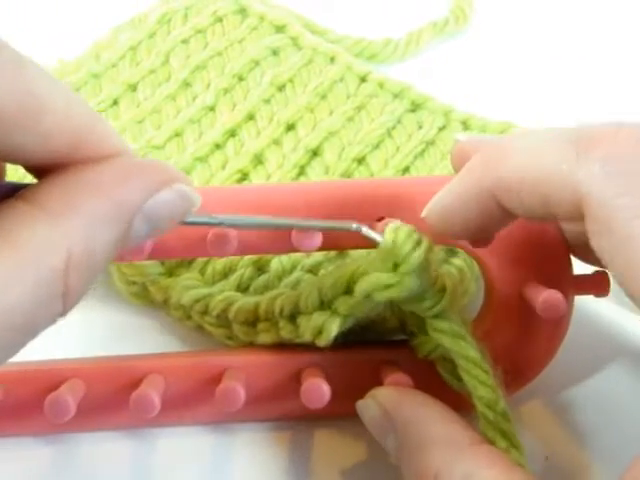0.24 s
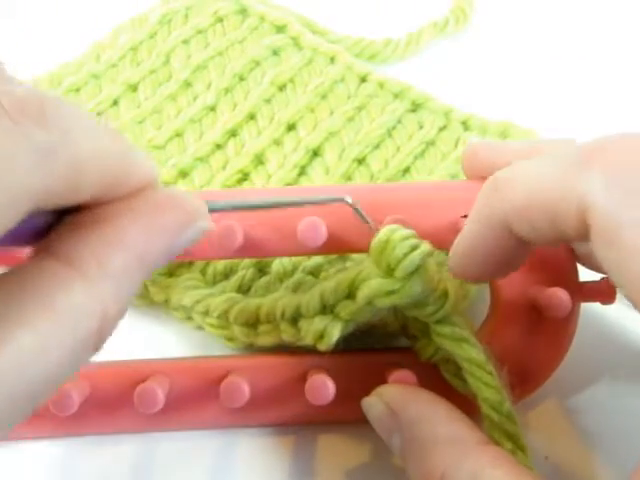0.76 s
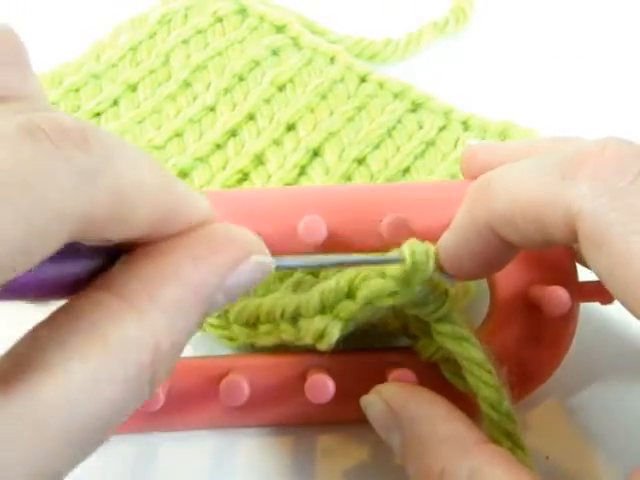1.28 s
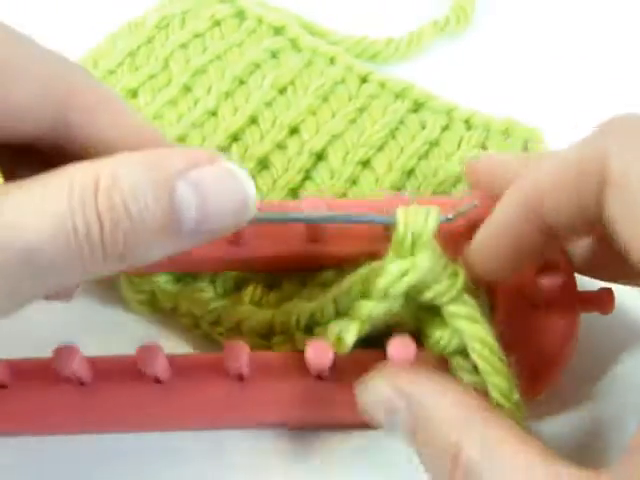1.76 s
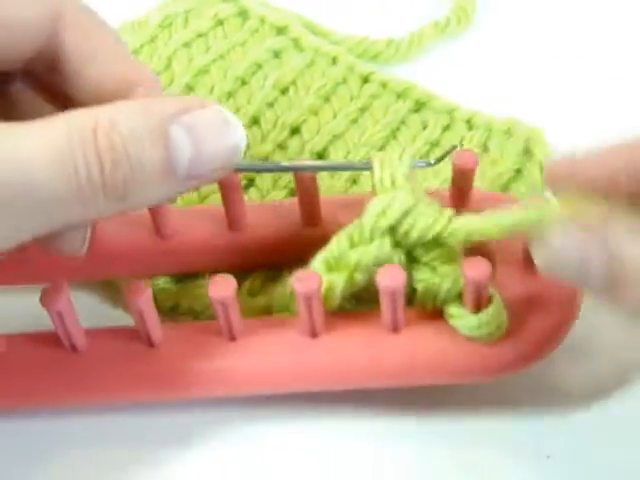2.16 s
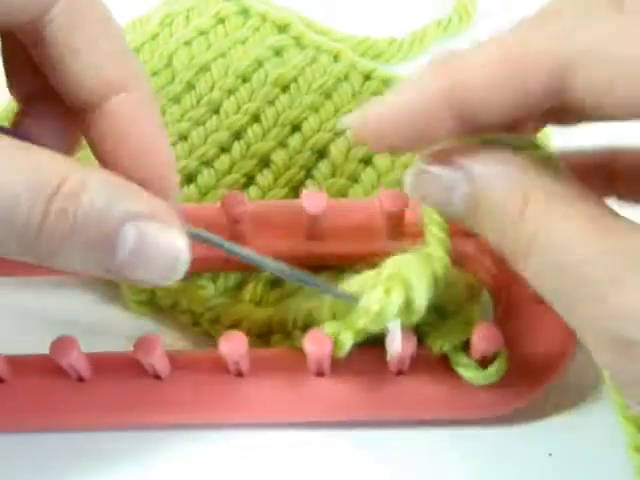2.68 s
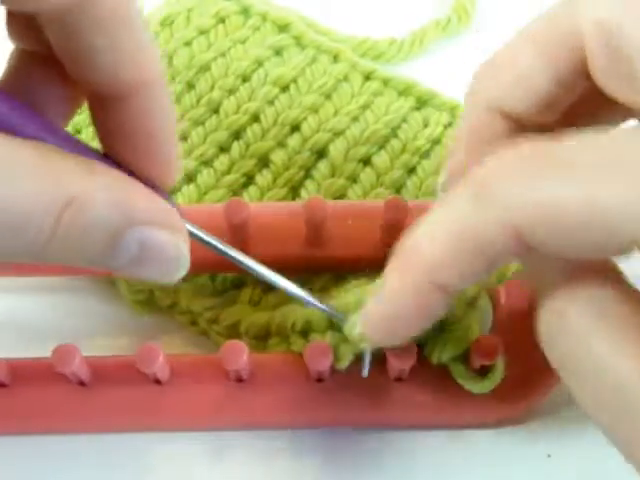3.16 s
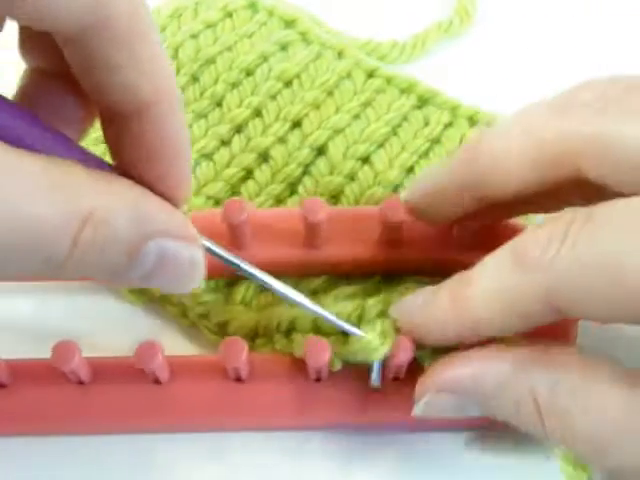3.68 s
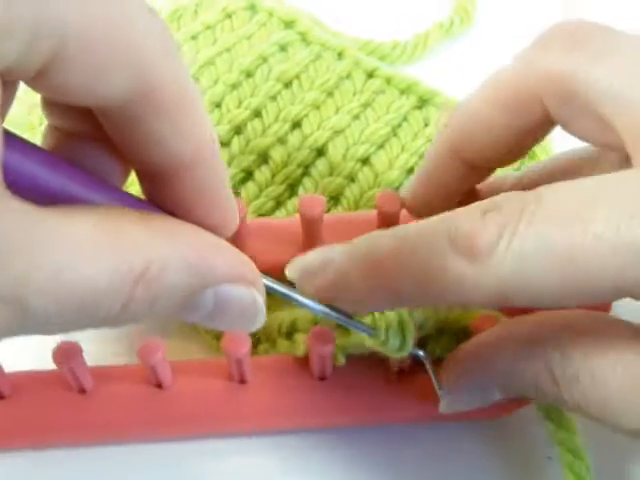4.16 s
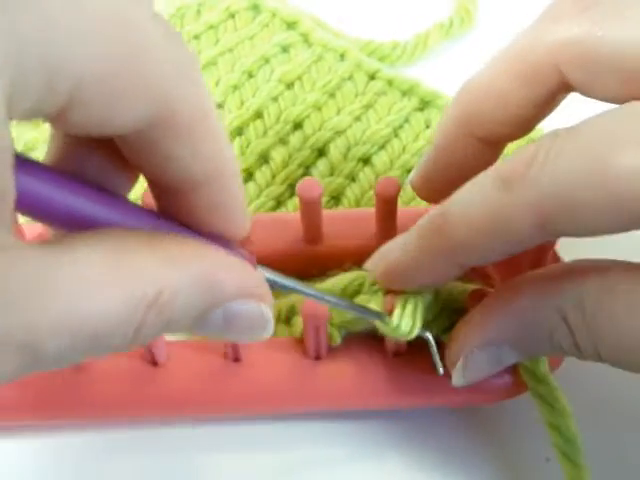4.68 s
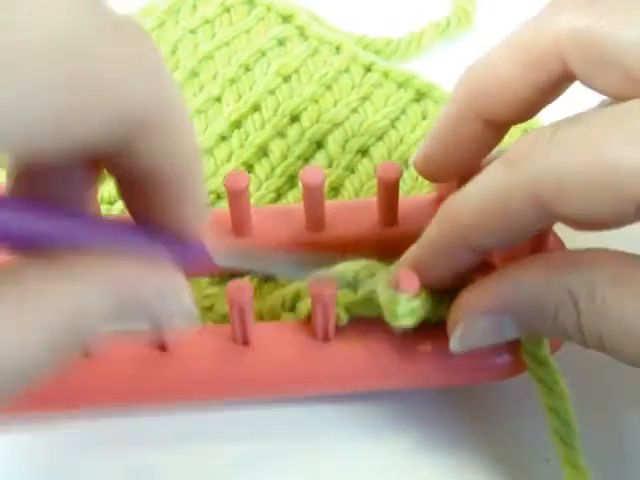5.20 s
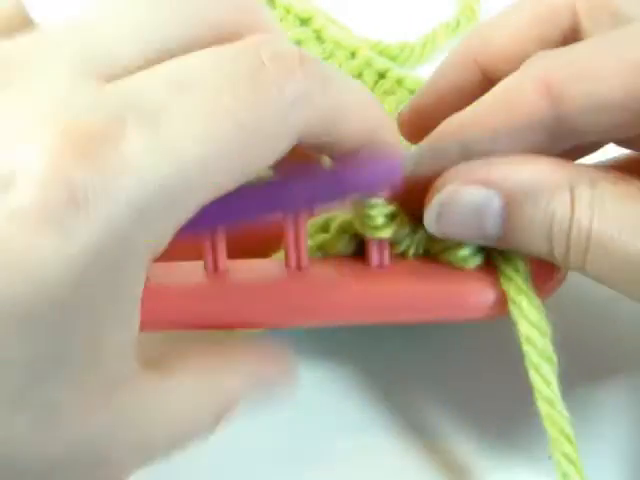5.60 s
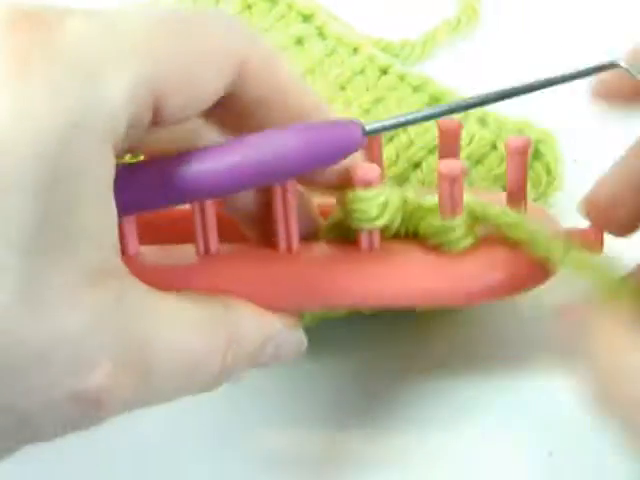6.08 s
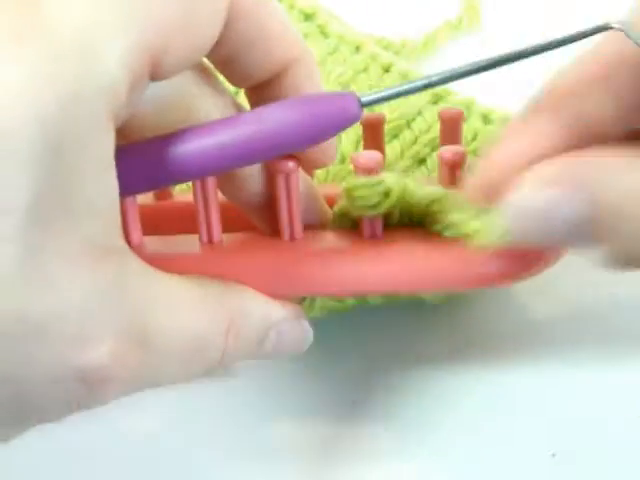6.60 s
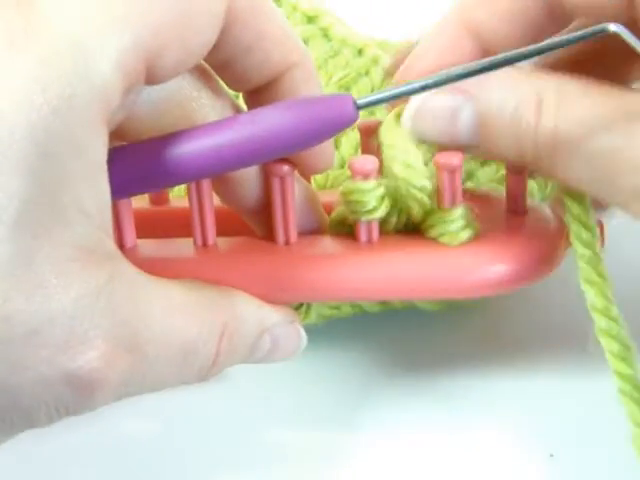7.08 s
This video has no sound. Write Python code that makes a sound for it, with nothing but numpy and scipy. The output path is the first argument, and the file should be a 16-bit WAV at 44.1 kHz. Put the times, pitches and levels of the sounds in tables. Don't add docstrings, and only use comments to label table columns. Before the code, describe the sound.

Close handling of a plastic loom on a table in a small, quiet room. Soft hollow bumps and a short rub open the first half second, then mostly dull room air until a cluster of nudges near 1.6-1.7. Around 1.9-2.5, scrapes, dry yarn rustle and light clacks. At 3.15 a strong, woody multiple knock; a brush at 3.7; another firm clack at 4.2. Small bumps, rubs and faint high hook ticks follow from 4.3 to 5.0, with a knock at 4.85 and dry rustles at 5.2-5.7. At 6.0 comes by far the loudest thump, hollow with a plastic crack and short rattle. Lesser knocks at 6.3 and 6.76, then soft bumps to 7.3. Far engines drone and change gear, cars pass faintly, and a very thin high whine persists. The cheap microphone is boxy, with little true treble and a gritty mirrored edge.

```python
import sys
import numpy as np
from scipy import signal
from scipy.fft import rfft, irfft
from scipy.io import wavfile
from scipy.ndimage import uniform_filter1d, map_coordinates

SR = 44100
rng = np.random.default_rng(int(sys.argv[2]) if len(sys.argv) > 2 else 0)


def bounce(signal):
    frames = np.transpose(np.atleast_2d(signal))
    limited = np.clip(frames, -1, 1)
    pcm = np.round(limited * 32767).astype(np.int16)
    wavfile.write(sys.argv[1], SR, pcm)


def invert_db(level):
    return 10 ** (np.asarray(level, dtype=float) / 20)


N = 323694
TIME = np.arange(N) / SR

# (time [s], peak level [dB], favoured table resonance [Hz], frame ring [dB], peg crack [dB])
KNOCKS = [(2.0355, -29.5, 143, -39.5, -36.5), (2.261, -52, 297.4, -66, -30.5), (2.272, -38, 410, -43, -35),
          (3.1415, -18.5, 151, -32.5, -34.5), (3.143, -15.5, 368, -38, -31), (3.154, -21.5, 275, -49, -43),
          (4.204, -19.5, 141, -55, -57), (4.206, -19, 216, -44, -37), (4.209, -24, 426, -37.5, -48),
          (4.853, -26.5, 474, -55, -40), (6.0003, -5.5, 131, -19.5, -19), (6.002, -16, 132, -29, -56),
          (6.003, -8, 232, -43, -24), (6.004, -9.5, 384, -46, -72), (6.329, -21.5, 352, -42.5, -39),
          (6.759, -32.5, 271.7, -46, -36.5)]
# (time [s], peak level [dB], favoured table resonance [Hz], frame ring [dB])
BUMPS = [(0.036, -32, 340, -67), (.069, -28, 200, -51), (.08, -23, 326, -41), (0.193, -23, 313, -40.5),
         (.372, -39, 230, -44.5), (0.399, -37, 193, -52), (0.429, -33, 365, -67), (1.623, -36, 334, -62),
         (1.653, -30.5, 338, -54), (1.672, -28, 352, -58), (1.699, -29.5, 364, -51),
         (1.948, -41.5, 173, -51), (2.239, -30, 175, -54), (4.312, -29, 229, -54), (4.549, -32, 243, -46),
         (4.659, -32, 224.5, -47), (6.315, -21, 287, -52), (6.415, -36, 358, -53), (6.608, -38, 376, -52),
         (7.003, -36, 337, -57), (7.038, -39, 369, -56), (7.292, -31.5, 472, -63)]
# (time [s], peak level [dB], ring [Hz], t60 [s])
TICKS = [
    (1.744, -46, 2100, .03),
    (4.4618, -31, 2720, .04),
    (4.5545, -39, 2650, .06),
    (4.9855, -48, 2430, .025),
    (6.495, -44, 2330, .025),
]
# (start [s], length [s], table rumble [dB], frame rasp [dB], yarn hiss [dB])
DRAGS = [(0.011, 0.11, -34, -50.5, -80), (0.341, 0.082, -35.5, -56, -62), (1.614, 0.2, -46, -52.5, -62),
         (1.86, 0.22, -39, -53, -59.5), (2.06, .04, -48, -41, -56), (2.095, .06, -45, -35.5, -47),
         (2.191, 0.088, -38.5, -46, -54.5), (2.3, 0.248, -47, -56, -59), (3.662, 0.2, -46, -51.5, -57.5),
         (4.311, .12, -38, -42, -58.5), (4.445, 0.036, -39, -52, -58), (4.545, 0.051, -38.5, -47, -68),
         (4.65, 0.044, -39, -45, -57), (5.2, 0.088, -45.5, -53.5, -63), (5.286, 0.063, -55, -51, -48.5),
         (5.331, 0.079, -54, -43, -49.5), (5.637, 0.16, -57, -52, -57), (6.194, 0.063, -42.5, -48.5, -60),
         (7.222, 0.094, -45.5, -57, -58)]
# (frequency [Hz], level [dB], t60 [s])
TABLE_MODES = [(105, -8, .12), (128, -2, .05), (151, 0, .11), (185, -4, .05), (220, -3, .07), (243, 0, .12),
               (265, -3, .13), (312, -8, .08), (340, 0, .1), (365, -6, .07), (415, -2, .07), (470, -7, .08)]
# (frequency [Hz], level [dB], t60 [s])
FRAME_MODES = [(665, -5, .06), (797, 0, .07), (835, -3, .05), (937, -1, .035), (990, 0, .07),
               (1060, -4, .05), (1165, -4, .05)]
# (frequency [Hz], level [dB], t60 [s])
PEG_MODES = [(1390, -25, 0.037), (2600, -8, 0.022), (1666, -11, 0.058), (1870, -8, 0.014),
             (2143, -3, 0.026)]
# (start [s], length [s], firing rate at the start [Hz],
# level [dB], octave level [dB])
LORRY = [
    (.15, 0.49, 79.5, -49.5, -56),
    (.8, 0.99, 82.6, -48.5, -61),
    (2.05, 0.3, 61, -40.5, -67),
    (2.45, 0.28, 62.4, -43.5, -50),
    (3.25, .6, 65, -58, -51.5),
    (4.4, 0.79, 70.4, -47, -65),
    (5.4, 0.55, 73, -51, -66),
    (6.5, 0.27, 73.1, -47.5, -61),
    (7, .4, 76.7, -47, -52),
]
# (start [s], length [s], firing rate at the start [Hz], level [dB], octave level [dB])
CAR = [
    (2.7, .15, 52, -61, -48),
    (3.4, 0.033, 53, -66, -47.5),
    (3.98, 0.17, 52.5, -66, -44.5),
    (4.72, 0.41, 49.5, -53, -46.5),
]
# (closest time [s], kerb distance over speed [s], low roar [dB], tyre band [dB])
TRAFFIC = [
    (2.4, 0.27, -46.5, -51.5),
    (4.1, 0.93, -46.5, -63.5),
    (4.9, 0.24, -42.5, -52.5),
    (6.3, 0.63, -47.5, -60),
    (7.4, 0.084, -53, -43.5),
]
# (frequency [Hz], level [dB])
AIR = [(20, -1), (40, -5), (62, 3.5), (125, 0), (200, 0), (280, -5.5), (370, -8.5), (480, -19.5),
       (560, -11), (800, -9), (1250, -13), (1600, -14), (2200, -13.5)]
# (frequency [Hz], level [dB])
MIC = [(1500, 0), (2400, -1), (3200, -4.5), (3900, -5)]

KNOCK_RING, BUMP_RING = .75, .8
KNOCK_FOCUS, BUMP_FOCUS = 32, 45
KNOCK_SWELL_S, BUMP_SWELL_S = .0049, .0055
BUMP_FRAME_HZ, BUMP_FRAME_FOCUS = 815, 50
BUMP_CRACK_DB = -5
FRAME_RING = 1.5
RATTLE_DB, RATTLE_S = -2.5, .034
TAP_DB, TAP_S = 10.5, .00049
DRAG_RISE, DRAG_FALL = .6, .12
ROOM_T60_S, ROOM_DB = .5, -29
LORRY_CLIMB, CAR_CLIMB = .045, .3
ENGINE_RISE_S, ENGINE_FALL_S = .19, .27
AIR_DB, STREET_DB = -43.5, -48.5
WHINE_HZ, WHINE_DB = 2283, -63
CLOCK_HZ, EDGE_HZ = 8000, 3960
CLOCK_DB = -73
TOP_HZ = 11030
OFFSET = -.0133


def shape(points, hz):
    f, db = np.transpose(points)
    return invert_db(np.interp(np.log(np.maximum(hz, 1)), np.log(f), db))


def unit(x):
    return x / np.sqrt(np.mean(x ** 2))


def band(x, lo_hz, hi_hz, order=2):
    sos = signal.butter(order, [lo_hz, min(hi_hz, .45 * SR)], "bandpass", fs=SR, output="sos")
    return signal.sosfilt(sos, x)


def walk(rate):
    k = int(SR / rate)
    steps = np.repeat(rng.standard_normal(N // k + 1), k)
    return 1.14 * uniform_filter1d(uniform_filter1d(steps, k), k)[:N]


def spell(start_s, length_s, rise_s, fall_s):
    up = (TIME - start_s) / rise_s + .5
    down = (start_s + length_s - TIME) / fall_s + 1
    return np.sin(np.pi / 2 * np.clip(np.minimum(up, down), 0, 1)) ** 2


def add(out, s, db, sound):
    i = int(s * SR)
    out[i:i + len(sound)] += (invert_db(db) * sound / np.abs(sound).max())[:len(out) - i]


def struck(modes, weight, contact_s):
    hz, db, t60 = np.transpose(modes)[:, :, None]
    t = TIME[:12000]
    decay = np.exp(-np.log(1000) * t / t60)
    ring = np.sum(invert_db(db) * weight[:, None] * decay * np.sin(2 * np.pi * hz * t), axis=0)
    push = np.sin(np.pi * np.arange(0, 1, 1 / (contact_s * SR))) + 1e-9
    return signal.fftconvolve(ring, push)[:len(t)]


def rubbed(modes, force):
    out = 0
    for hz, db, t60 in modes:
        pole = np.exp(2j * np.pi * hz / SR - np.log(1000) / (t60 * SR))
        ring = signal.lfilter([1], [1, -2 * pole.real, abs(pole) ** 2], force)
        out = out + invert_db(db) * ring * pole.imag
    return unit(out)


def contact(out, s, db, focus_hz, frame_db, crack_db, free, focus, swell_s, rail):
    table_hz, frame_hz = np.transpose(TABLE_MODES)[0], np.transpose(FRAME_MODES)[0]
    t, burst_t = TIME[:12000], TIME[:5000]
    spread, noise = rng.standard_normal(24), rng.standard_normal(5000)
    held = np.array([1, 1, free])
    place_db = -focus * np.abs(np.log2(table_hz / focus_hz)) + spread[:12]
    rail_db = -rail * np.abs(np.log2(frame_hz / BUMP_FRAME_HZ)) + 1.5 * spread[12:19]
    soft = 1 - np.exp(-t / (.00025 * invert_db(frame_db - crack_db)))

    table = (np.exp(-t / swell_s) - 1) * struck(TABLE_MODES * held, invert_db(place_db), contact_s=.001)
    add(out, s + .001, db, table)
    frame_modes = FRAME_MODES * held * [1, 1, FRAME_RING]
    frame = struck(frame_modes, invert_db(rail_db) * (-1) ** np.arange(7), contact_s=.0006)
    add(out, s, frame_db + 10, soft * frame)
    pegs = struck(PEG_MODES * held, invert_db(2 * spread[19:]) * (-1) ** np.arange(5), contact_s=.0002)
    add(out, s, crack_db + 1, pegs)
    rattle = noise * soft[:5000] * np.exp(-burst_t / RATTLE_S)
    add(out, s, frame_db + RATTLE_DB, band(rattle, 410, 1570))
    if not rail:
        tap = np.sin(np.pi * np.clip(t[:500] / TAP_S, 0, 1))
        add(out, s, frame_db + TAP_DB, band(tap, 690, 2800, order=1))
    crack = noise[::-1] * np.exp(-burst_t / .0031)
    add(out, s, crack_db + 8, band(crack, 470, 6300, order=1))


def knocks():
    out = np.zeros(N)
    for knock in KNOCKS:
        contact(out, *knock, KNOCK_RING, KNOCK_FOCUS, KNOCK_SWELL_S, rail=0)
    for bump in BUMPS:
        crack_db = bump[-1] + BUMP_CRACK_DB
        contact(out, *bump, crack_db, BUMP_RING, BUMP_FOCUS, BUMP_SWELL_S, rail=BUMP_FRAME_FOCUS)
    return out


def ticks():
    out = np.zeros(N)
    for s, db, hz, t60 in TICKS:
        add(out, s, db, struck([(hz, 0, t60)], np.ones(1), contact_s=.0001))
    return out


def drags():
    levels = 0
    for s, length, *db in DRAGS:
        stroke = spell(s, length, DRAG_RISE * length, DRAG_FALL * length)
        levels = levels + invert_db(db)[:, None] * stroke
    rumble, rasp, hiss = levels
    noise = rng.standard_normal((3, N))
    slips = (rng.random((2, N)) < 2500 / SR) * invert_db(1.5 * rng.exponential(size=(2, N)))
    catch = invert_db(1.8 * walk(60))
    table = rubbed(TABLE_MODES[3:], noise[0])
    frame = rubbed(FRAME_MODES[1:] + PEG_MODES[:1], noise[1] * catch * (.41 + slips[0]))
    grain = noise[2] * invert_db(2 * walk(90)) * (1 + slips[1])
    fibre = unit(band(grain, 1700, 5000, order=1) + .7 * band(grain, 1550, 3050))
    return rumble * table + rasp * frame + invert_db(10) * hiss * fibre


def room(x):
    t = TIME[:20000]
    scatter = band(rng.standard_normal(len(t)), 51, 210, order=1)
    tail = scatter * np.exp(-np.log(1000) * t / ROOM_T60_S) * np.clip(t / .0065, 0, 1)
    return signal.fftconvolve(x, tail / np.sqrt(np.sum(tail ** 2)))[:N]


def engine(pulls, climb):
    s, length, hz = np.transpose(pulls)[:3]
    turns = np.sort(np.r_[s, s + length])
    rate = np.interp(TIME, turns, np.c_[hz, hz * (1 + climb * length)].ravel())
    levels = 0
    for start_s, length_s, _, *db in pulls:
        levels = levels + invert_db(db)[:, None] * spell(start_s, length_s, ENGINE_RISE_S, ENGINE_FALL_S)
    first, second = levels
    phase = 2 * np.pi * np.cumsum(rate * (1 + .0131 * walk(8))) / SR
    return np.sqrt(2) * (first * np.sin(phase) + second * np.sin(2 * phase + 1))


def traffic():
    roar_power, tyres = invert_db(2 * STREET_DB), 0
    for s, pace_s, roar_db, tyre_db in TRAFFIC:
        near = 1 / (1 + ((TIME - s) / pace_s) ** 2)
        roar_power = roar_power + invert_db(2 * roar_db) * near
        tyres = tyres + invert_db(tyre_db) * near
    noise = rng.standard_normal((2, N))
    low = unit(band(noise[0], 318, 487) + 1.46 * band(noise[0], 469, 479.8))
    return np.sqrt(roar_power) * low + tyres * unit(band(noise[1], 1063, 1363))


def fan_whine():
    tone = np.sin(2 * np.pi * WHINE_HZ * TIME + .42 * walk(6.7))
    return invert_db(WHINE_DB + walk(2.64)) * np.sqrt(2) * tone


def room_air():
    hz = np.arange(N // 2 + 1) * SR / N
    spectrum = rfft(rng.standard_normal(N)) * shape(AIR, hz)
    swell, air = walk(.11), 0
    treble_stir = walk(35)
    for centre in np.arange(4, 13, .5):
        share = np.clip(1 - 2 * np.abs(np.log2(np.maximum(hz, 1)) - centre), 0, 1)
        flicker_db = .4 * swell + .7 * walk(6) + .5 * np.clip(centre - 10, 0, 2) * treble_stir
        air = air + invert_db(flicker_db) * irfft(spectrum * share, N)
    return invert_db(AIR_DB) * air / np.std(band(air, 29, 2600, order=1))


def scene():
    near = band(knocks() + ticks() + drags(), 75, 16000)
    engines = engine(LORRY, LORRY_CLIMB) + engine(CAR, CAR_CLIMB)
    mix = near + invert_db(ROOM_DB) * room(near) + engines + traffic() + fan_whine() + room_air()
    return mix[None]


def low_pass(x):
    return signal.sosfilt(signal.butter(12, 12180, fs=SR, output="sos"), x)


def record(dry):
    cepstrum = irfft(np.log(shape(MIC, np.arange(1025) * SR / 2048)))
    cepstrum[1:1024] *= 2
    response = irfft(np.exp(rfft(cepstrum[:1024], 2048)))[:1024]
    coloured = signal.fftconvolve(dry[0], response)[:N]
    guard = signal.ellip(10, .3, 60, EDGE_HZ, fs=SR, output="sos")
    heard = signal.sosfilt(guard, coloured)

    clock = np.arange(N * CLOCK_HZ // SR + 2)
    sampled = map_coordinates(heard, [clock * SR / CLOCK_HZ], mode="nearest")
    sampled = sampled + invert_db(CLOCK_DB) * (-1.) ** clock
    joined = np.zeros(N)
    joined[::2] = 2 * np.interp(TIME[::2] * CLOCK_HZ, clock, np.clip(sampled, -1, 1))
    smoother = signal.firwin(65, TOP_HZ, window=("kaiser", 7.), fs=SR)
    finished = signal.fftconvolve(joined, smoother, mode="same") + OFFSET
    return low_pass(finished[None])


dry = scene()
out = record(dry)
bounce(out)
```